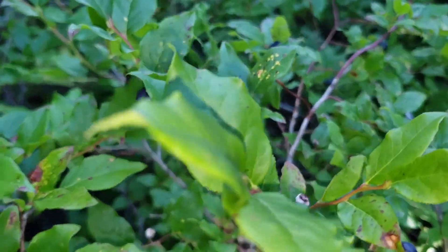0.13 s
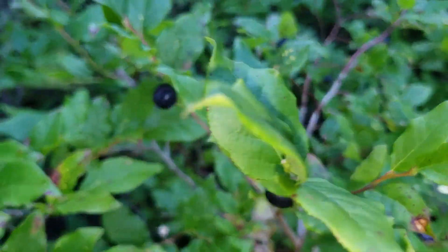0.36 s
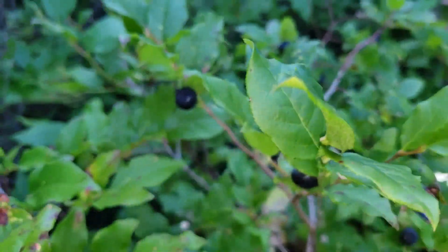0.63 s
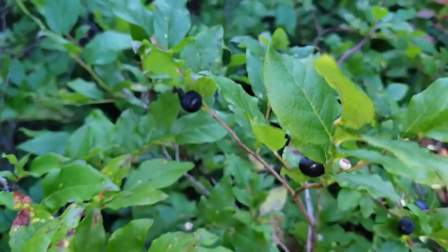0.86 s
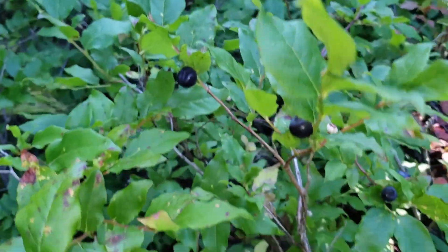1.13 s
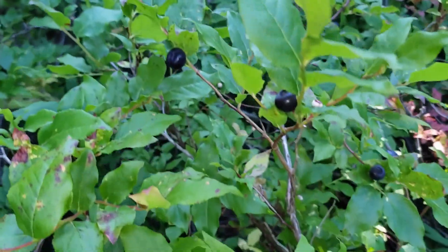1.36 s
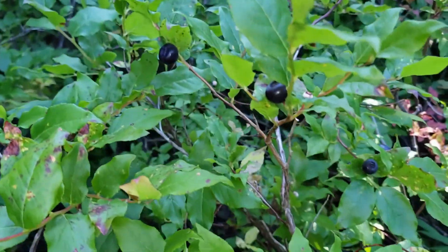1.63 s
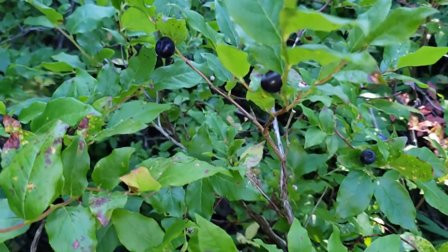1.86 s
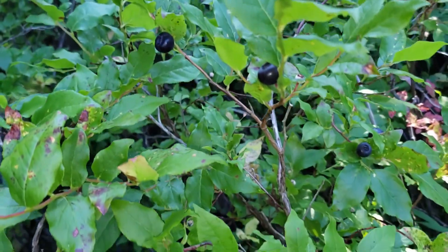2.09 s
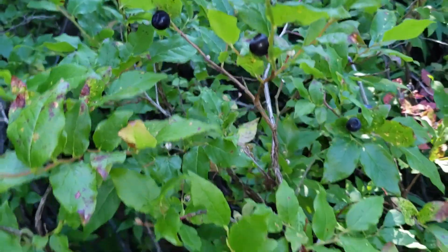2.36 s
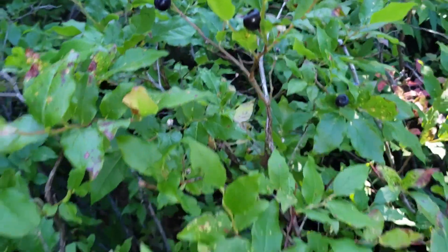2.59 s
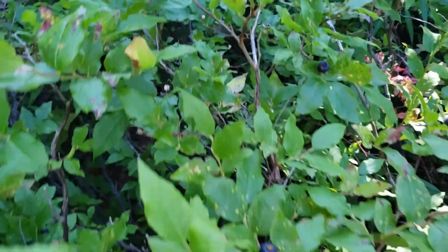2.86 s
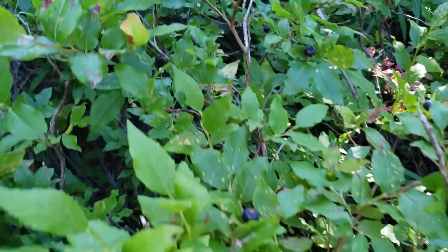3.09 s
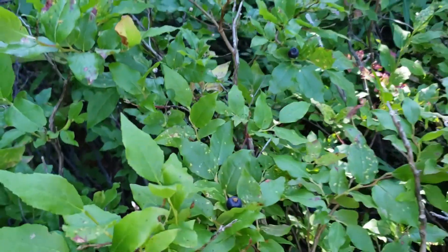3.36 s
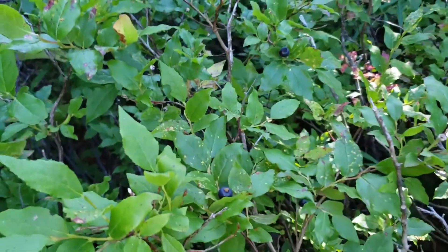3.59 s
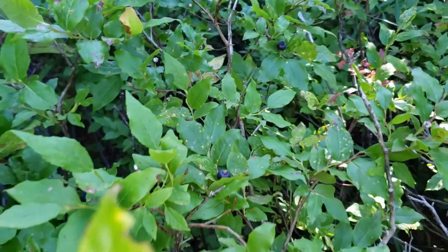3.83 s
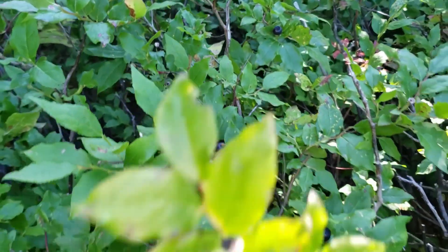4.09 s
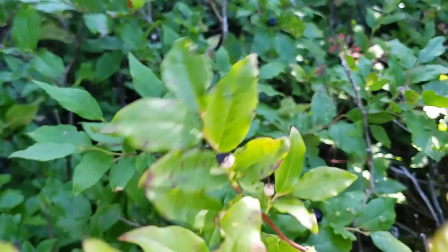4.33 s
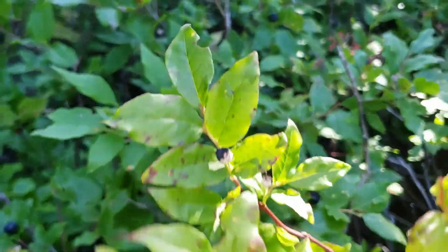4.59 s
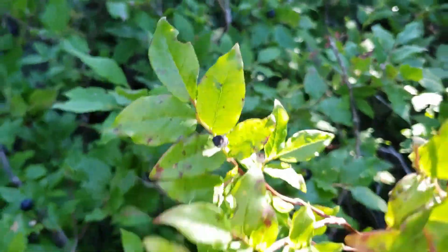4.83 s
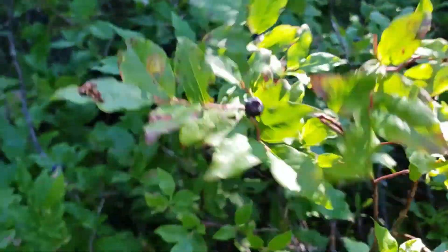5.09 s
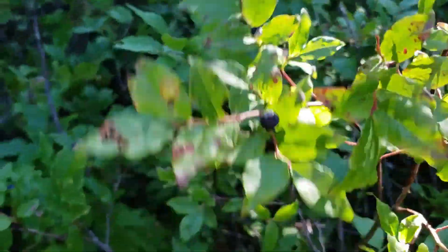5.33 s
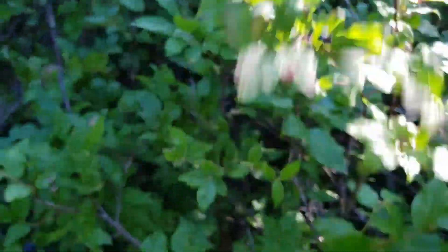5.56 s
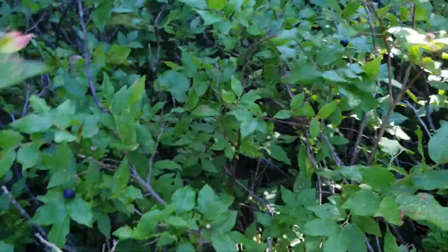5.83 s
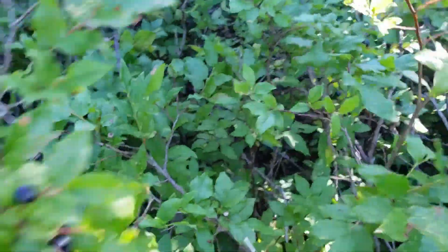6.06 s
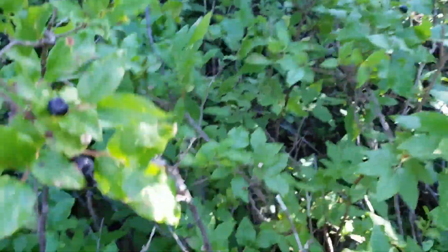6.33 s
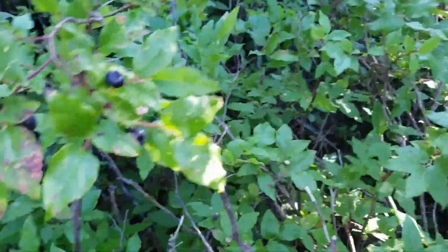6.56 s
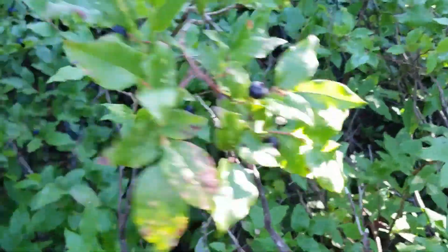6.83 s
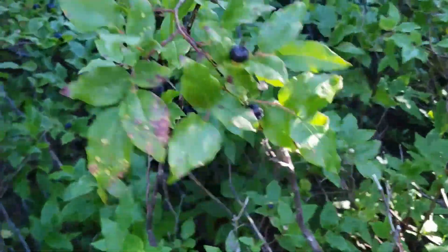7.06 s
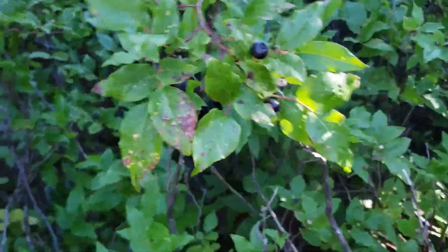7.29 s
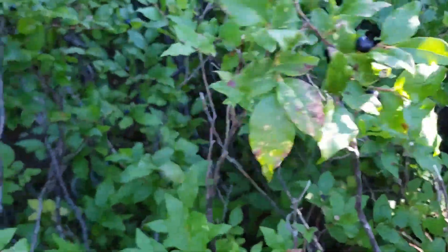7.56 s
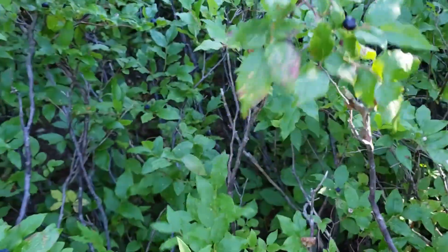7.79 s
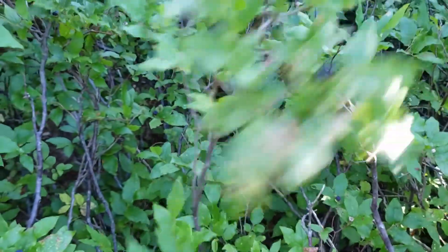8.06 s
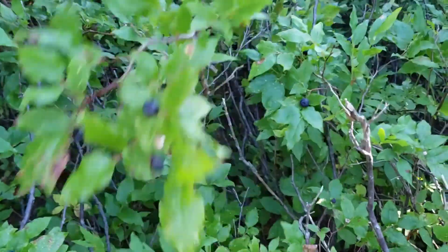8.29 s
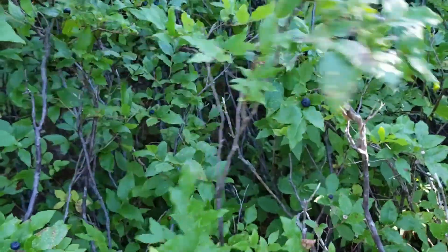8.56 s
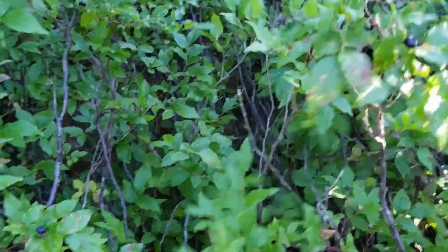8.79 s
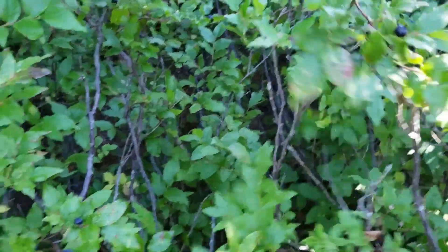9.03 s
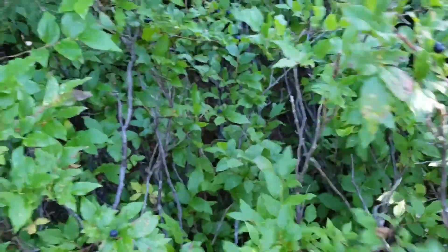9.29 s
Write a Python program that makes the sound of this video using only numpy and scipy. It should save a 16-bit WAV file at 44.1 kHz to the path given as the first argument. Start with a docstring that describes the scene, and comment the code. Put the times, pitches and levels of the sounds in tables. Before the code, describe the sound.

Someone pushes through leafy shrubs outdoors: crisp leaf swishes, scraping stems, dry snaps and dull branch knocks, ending in the loudest rustling.

```python
"""A hand pushes through berry bushes close beside a small stereo recorder, in the open with no walls.
Leaves brush, stems scrape and branches rub as dense coloured ticks; twigs crack, stiff leaves flick and
leaf tips tick as dying showers of them. Branches and fingers knock as sagging low modes, bumps of the
case are slow swings, and the grip rumbles and rubs. A springy branch swishes back as a swell of noise;
a faint breeze and far-off rumble fill the gaps. The two microphones stand apart and differ in colour."""
import sys
import numpy as np
from scipy import signal
from scipy.fft import rfft, irfft
from scipy.io import wavfile
from scipy.ndimage import uniform_filter1d

SR = 44100
rng = np.random.default_rng(int(sys.argv[2]) if len(sys.argv) > 2 else 0)


def bounce(signal):
    """Save signal as a 16-bit WAV file at the path given by the first command-line argument."""
    frames = np.transpose(np.atleast_2d(signal))
    limited = np.clip(frames, -1, 1)
    pcm = np.round(limited * 32767).astype(np.int16)
    wavfile.write(sys.argv[1], SR, pcm)


def invert_db(x):
    """Field ratio 10**(x/20) for x, a level in decibels (scalar or array-like)."""
    u = np.asarray(x, float) / 20
    return 10 ** u


N = 414981  # length in samples

# All levels are nominal, ahead of the microphones; left_minus_right_db is positive towards the left.
# Brushing close by, one list per stroke: time_s, leaf_edge_crinkle_db, stem_scrape_db
BRUSH_STROKES = [
    [(0, -70.5, -79), (0.12, -65, -84), (0.27, -60, -69.5), (0.39, -67, -84), (0.63, -67.5, -76.5),
     (0.83, -66, -78.5), (1.13, -73.5, -81.5), (1.48, -69, -81.5), (1.75, -100, -88), (1.99, -74, -94),
     (2.13, -83, -100), (2.23, -56, -74)],
    [(2.245, -46, -59), (2.387, -50.5, -66), (2.49, -53.5, -67.5), (2.599, -56.5, -66),
     (2.65, -46.5, -62.5), (2.741, -47, -61.5), (2.835, -51.5, -64), (3.037, -55.5, -73.5)],
    [(3.047, -51, -70), (3.131, -58.5, -60.5), (3.249, -59.5, -70), (3.299, -56, -63.5),
     (3.413, -58, -70.5), (3.655, -60.5, -72), (3.861, -59, -70), (3.915, -57, -72.5), (4.015, -56, -60.5)],
    [(4.025, -44, -50), (4.07, -37.5, -50.5), (4.125, -53, -59), (4.165, -57, -58), (4.18, -50, -58),
     (4.205, -52, -49.5), (4.303, -57, -61.5), (4.345, -60, -70)],
    [(4.36, -61, -74), (4.404, -73, -89), (4.582, -61, -77.5), (4.704, -57, -77.5), (4.842, -59.5, -72),
     (4.9, -61, -70), (4.948, -64.5, -80), (5.0, -52, -64)],
    [(5.056, -60.5, -69), (5.166, -50.5, -63.5), (5.225, -50.5, -61.5), (5.26, -44.5, -59.5),
     (5.31, -50, -62.5), (5.37, -48.5, -58.5), (5.4, -59.5, -74)],
    [(5.502, -56.5, -71.5), (5.654, -56, -68), (5.736, -61.5, -73.5), (5.944, -61, -73),
     (6.132, -59.5, -68), (6.185, -66, -72)],
    [(6.195, -48.5, -62), (6.279, -59.5, -72), (6.417, -64, -76.5), (6.551, -63, -76.5), (6.751, -58, -72),
     (6.915, -68, -74.5), (7.121, -67, -78), (7.253, -64, -84), (7.33, -76, -80), (7.36, -62, -67),
     (7.45, -70, -70), (7.541, -68.5, -73.5), (7.695, -54.5, -66), (7.735, -56, -60)],
    [(7.745, -41, -47.5), (7.841, -46, -56.5), (7.883, -43, -51.5), (8.003, -51.5, -58.5),
     (8.129, -51.5, -65), (8.263, -53, -64.5), (8.337, -64, -81)],
    [(8.523, -61.5, -88), (8.579, -57, -75), (8.661, -51.5, -64.5), (8.76, -46, -56), (8.83, -39, -56),
     (8.86, -45.5, -56), (8.903, -39, -51.5), (8.981, -40.5, -54.5), (9.03, -44, -54.5), (9.06, -38.5, -51),
     (9.09, -37, -53.5), (9.14, -35, -48.5), (9.2, -32.5, -45), (9.26, -40, -53.5), (9.31, -38.5, -49.5),
     (9.35, -36, -49), (9.41, -34.5, -48)],
]
# Branches rubbing on each other: time_s, level_db
BRANCH_RUB = [(0, -72), (0.8, -70), (1.62, -73), (2.13, -78), (2.245, -58.5), (2.39, -62), (2.741, -58),
              (2.835, -66), (3.3, -68), (3.9, -74), (4.025, -57.5), (4.149, -63), (4.195, -54),
              (4.345, -63), (4.42, -84), (4.56, -73), (4.7, -75.5), (5.056, -66.5), (5.324, -60.5),
              (5.5, -74), (5.9, -73), (6.0, -64), (6.5, -70.5), (6.9, -76), (7.39, -68.5), (7.64, -71.5),
              (7.745, -55), (7.883, -54.5), (8.003, -65.5), (8.263, -66), (8.5, -81), (8.791, -58.5),
              (8.903, -51), (9.051, -52.5), (9.3, -44.5), (9.41, -46.5)]
# Grip shifting on the recorder: time_s, rumble_db, cloth_and_finger_rub_db
GRIP_SHIFTS = [(0.0, -76.5, -79), (1.57, -80.5, -90), (2.22, -76, -78), (2.41, -76, -63.5),
               (2.53, -77, -64), (2.62, -75, -58), (2.76, -79, -68), (2.86, -76, -75), (3.88, -79, -82),
               (4.22, -65, -63), (4.43, -80, -81.5), (5.13, -70, -70.5), (5.58, -70.5, -75),
               (5.89, -83, -75.5), (6.37, -82, -81), (7.94, -71.5, -68.5), (8.49, -86.5, -78.5),
               (8.72, -78, -70.5), (8.92, -71, -57.5), (9.04, -70, -64), (9.18, -74, -53.5),
               (9.25, -79, -55), (9.41, -79, -54)]
# Twigs snapping: start_s, body_db, fine_splinters_db, body_pitch_hz, left_minus_right_db
TWIG_SNAPS = [(0.7647, -47.5, -40, 2890, 6.5), (2.241, -43, -25, 6300, 10), (2.2427, -45, -26, 6260, 10),
              (2.048, -56, -49, 3500, 9), (2.053, -54.5, -60, 2000, 7.5), (3.075, -22.5, -21, 6040, -6.5),
              (3.0786, -25.5, -30, 4200, -2.5), (3.089, -30, -36, 4300, -3),
              (3.0924, -33.5, -35, 4000, -6.5), (3.135, -49, -58, 2650, 0.5), (3.252, -55, -36, 6520, -2),
              (3.976, -35.5, -35, 2290, -2), (4.042, -30, -18, 2460, 7), (4.032, -39, -36, 1880, -2),
              (4.065, -42, -38, 5000, 1), (4.099, -39.5, -50, 1600, -2.5), (4.143, -42.5, -47, 1450, -4),
              (4.162, -47, -60, 1300, 0), (4.198, -41, -55, 1300, 4), (4.2117, -25.5, -32, 2300, 5),
              (4.219, -26, -15, 7000, -0.5), (4.2199, -33.5, -18, 1420, -5),
              (4.2216, -22, -11.5, 4000, -1.5), (4.2243, -32, -12, 3020, 2), (4.2253, -19.5, -8.5, 4400, 2),
              (4.227, -23.5, -10.5, 4020, -1), (4.2301, -23.5, -18, 4080, -0.5),
              (4.245, -50.5, -36.5, 6500, 8), (5.061, -44, -37.5, 7040, -1.5), (5.317, -39, -45, 3020, 0.5),
              (5.535, -40, -26, 4700, 6.5), (5.5376, -34.5, -26, 7100, 6), (5.681, -41, -58, 1800, -4),
              (5.698, -16.5, -8, 4800, -5.5), (5.699, -24.5, -23, 2100, -8), (5.703, -34, -42, 3000, -8),
              (6.118, -46, -57, 6500, 9), (6.696, -47, -41, 7520, -4), (6.812, -40, -32.5, 5200, 7),
              (6.9388, -32.5, -58, 2860, -8.5), (6.9411, -40, -60, 2900, -7), (6.943, -43, -63, 2000, -6),
              (7.3435, -35.5, -43, 3940, 5), (7.4248, -47, -67, 1500, -7), (7.672, -41, -48, 2940, -8),
              (7.69, -30, -27, 2230, 4.5), (7.719, -43, -60, 2800, -1), (7.742, -27.5, -28.5, 3730, 1.5),
              (7.7435, -27, -30, 2980, 2), (7.915, -25, -34, 4060, -1.5), (7.928, -34, -48, 2970, 1),
              (7.935, -35, -50, 3500, -1), (8.031, -38.5, -32, 6340, -8), (9.062, -25.5, -39, 6570, -3),
              (9.23, -35, -22, 5640, 5), (9.274, -42, -32, 4690, 1.5), (9.345, -39, -31, 6790, -1)]
# Stiff leaves flicking past and scraping:
# start_s, fine_splinters_db, body_db, body_pitch_hz, dying_time_ms (held to 40 at most), left_minus_right_db
LEAF_FLICKS = [(0.204, -56, -75, 2000, 9.1, -1), (0.275, -58, -64, 2700, 10, 2.5),
               (0.531, -60, -53, 2200, 4, 3), (0.534, -60, -61.5, 6000, 30, -1),
               (0.54, -70, -62, 2540, 15, -1), (0.766, -40.5, -57, 2760, 6.1, 2.5),
               (0.968, -36, -52.5, 2980, 10.5, 7), (1.094, -61, -65, 2900, 4.3, 1),
               (1.345, -54, -64, 2830, 49, 3), (1.527, -64, -61, 2830, 6.7, 2.5),
               (1.974, -57, -69, 4000, 6, 6.5), (2.243, -31, -48, 6600, 7.2, 7),
               (2.373, -44, -45, 6570, 5.1, 4.5), (2.445, -46, -49.5, 5000, 19, 6),
               (2.632, -49, -48.5, 2700, 27, 2), (2.842, -38.5, -49, 6700, 10, 8),
               (2.861, -45, -59, 6700, 7.3, 7), (3.152, -32.5, -45, 7350, 10.6, 7.5),
               (3.297, -40, -52, 2700, 5.3, 4), (3.32, -44, -65, 5000, 5.5, 1),
               (3.484, -38, -48, 2500, 6.3, 0), (3.593, -43.5, -50, 5070, 6.1, -2.5),
               (3.604, -52, -51, 5500, 3.7, 0), (3.911, -43, -66, 4630, 3, 1),
               (4.021, -36, -39, 3000, 4, 1.5), (4.05, -45, -42.5, 6540, 26, 3),
               (4.208, -32, -32, 4000, 11, 5.5), (4.219, -26, -32, 3500, 5.4, -1.5),
               (4.321, -38, -48, 2820, 8, 1), (4.825, -42.5, -52.5, 6700, 27, 0),
               (4.962, -43, -50, 6300, 8, -0.5), (4.969, -38.5, -51, 4060, 9.5, 2),
               (5.236, -43, -54, 7390, 3, 6), (5.244, -33, -43, 7390, 4, 6.5),
               (5.252, -40.5, -54, 7390, 23, 6), (5.368, -47, -51, 4000, 3.6, -1),
               (5.548, -39, -45.5, 5100, 5.7, 4.5), (5.339, -43, -51, 6800, 4.4, 6),
               (5.35, -46, -52, 6800, 15, 7.5), (5.747, -44, -52, 4480, 4.7, 4.5),
               (5.983, -46, -64, 6000, 6, 6), (6.094, -37.5, -45, 3830, 3.3, 1),
               (6.191, -46, -57.5, 7060, 21, 5), (6.58, -43.5, -54.5, 4100, 12, -2.5),
               (6.735, -45, -52.5, 5900, 31, 0), (6.8, -47, -58, 6000, 6.6, 5),
               (7.113, -50.5, -66, 6510, 8.7, 9), (7.395, -47.5, -69, 6000, 5.7, 6.5),
               (7.754, -36, -42.5, 7400, 33, 1), (7.901, -48, -42.5, 3000, 26, -3),
               (8.009, -28, -40.5, 2940, 3.7, -3), (8.145, -37, -46.5, 2290, 29, -0.5),
               (8.201, -37, -50, 6780, 12, -0.5), (8.271, -38, -62, 7100, 6.2, 6.5),
               (8.95, -30, -44, 3260, 3, -4.5), (9.175, -31, -37, 5500, 6, 0),
               (9.209, -22.5, -38, 6240, 4, 8.5)]
# Leaf tips ticking, nearly all splinter: start_s, fine_splinters_db, left_minus_right_db
LEAF_TIPS = [(0.6474, -46, 5), (0.9093, -46, 2.5), (2.2144, -43, 5.5), (2.435, -43, 4), (2.794, -40, 4),
             (3.247, -45, -11), (3.3972, -46, 8), (3.4221, -47, 1), (3.6526, -45, 7), (3.8921, -52, 6),
             (3.908, -44, -2), (4.1723, -35, 5), (5.015, -47, 1.0), (5.215, -37, 7), (5.471, -40, 5),
             (6.8638, -51, 7), (7.3425, -43, 8), (7.3864, -44, 8), (7.417, -49, 4), (8.0621, -47, 0),
             (8.0925, -41, 5.0)]
# Dull knocks of branches and fingers:
# start_s, level_db, nominal_pitch_hz, cycles_until_60_db_down, left_minus_right_db
DULL_KNOCKS = [(0.693, -54, 800, 8, 3), (0.764, -55.5, 450, 14, -2), (2.241, -40.5, 298, 13, 1),
               (2.268, -48, 198, 16, 0), (2.45, -53, 228, 15, -4), (2.49, -49.5, 800, 12, 4.0),
               (2.554, -41, 383, 6.5, 0), (2.596, -37.5, 330, 5.5, -1), (2.615, -46.5, 250, 15, -3),
               (2.662, -44.5, 450, 14, 1), (2.668, -50, 210, 10, -4), (2.637, -48, 517, 15, 0),
               (2.74, -46, 221, 8, -4), (2.756, -49, 180, 5.5, 3), (4.036, -54, 136, 29, -3),
               (4.189, -50, 590, 28, -19), (4.327, -50, 248, 20, -8), (5.315, -37.5, 350, 4, -6),
               (5.5355, -44.5, 600, 16, -4), (5.5357, -46, 1410, 26, 0), (5.698, -31, 208, 3, -30.5),
               (5.7005, -43, 720, 16, 6), (5.7, -27.5, 480, 6, -13.5), (5.725, -49.5, 440, 8, -13),
               (5.933, -54, 500, 6, -7), (5.951, -47, 320, 21, -2), (6.006, -48, 323, 17, -2),
               (6.019, -53, 302, 20, -4), (6.065, -59, 215, 30, 1), (6.095, -47.5, 920, 18, 0),
               (6.58, -59, 380, 10, 0), (6.61, -59, 380, 13, -2), (6.938, -47, 700, 9.5, -10),
               (7.343, -41.5, 880, 14, -6.5), (7.4245, -44, 700, 6.5, -12), (7.691, -40, 880, 5, -4),
               (7.75, -46, 594, 21, -4), (8.139, -56, 908, 19.5, -8), (8.898, -50.5, 303, 19, 1),
               (8.95, -45, 217, 13, -1), (9.1, -47, 397, 8, 2), (9.24, -46, 200, 14, -1),
               (9.219, -36.5, 207, 13, -1), (9.283, -37, 450, 12, 0), (9.294, -30, 523, 13, 3),
               (9.397, -34.5, 606, 17, 9)]
# Deep thumps of the bumped case: start_s, peak_db, final_pitch_hz, length_cycles, left_minus_right_db
CASE_THUMPS = [(4.251, -55.5, 59, 1.4, -6), (5.039, -56.5, 51, 2, -21), (5.671, -47, 59, 1.5, -22),
               (5.697, -41, 70.5, 1.4, -23), (5.705, -54, 145, 13, 10), (5.71, -46, 50, 1.1, -20.5),
               (5.744, -54, 60, 1, -16), (6.137, -55.5, 58, 1.9, 20), (6.953, -55.5, 54.4, 2.9, -16),
               (7.141, -57.5, 55, 4, -21), (7.422, -50.5, 75.4, 2, -17)]
# Colour of crinkling leaf edges: frequency_hz, gain_db
LEAF_EDGE_COLOUR = [(5000, -38.5), (8000, -3), (10000, -3), (13000, -1), (15200, -1.5)]
# Colour of brushing leaf faces: frequency_hz, gain_db
LEAF_FACE_COLOUR = [(2500, -23.5), (3800, 0.5), (5000, 2.5), (7000, -1), (8500, -7), (11000, -15)]
# Colour of scraping stems: frequency_hz, gain_db
STEM_COLOUR = [(900, -26), (1500, -5), (2200, -2.5), (3200, -1.5), (4200, -15), (6000, -22)]
# Colour of branches and twig wood: frequency_hz, gain_db
WOOD_COLOUR = [(150, -14.5), (320, -5.5), (520, -2.5), (800, -3), (1300, -7), (2200, -21.5)]
# Colour of fine splinters: frequency_hz, gain_db
SPLINTER_COLOUR = [(5000, -38.5), (7500, -6.5), (10000, -5.5), (12500, -0.5), (15500, -1.5)]
# Colour of the grip's rumble through the case: frequency_hz, gain_db
RUMBLE_COLOUR = [(20, -42), (40, -1.5), (60, 3), (120, -1), (250, -30)]
# Colour of cloth and fingers rubbing the case: frequency_hz, gain_db
RUB_COLOUR = [(85, -31), (140, -2.5), (210, 1.5), (330, -5), (600, -33.5)]
# Colour of the breeze and distant rumble: frequency_hz, gain_db
AIR_COLOUR = [(18, -39), (30, -1.5), (71, -2), (215, -17), (355, -6.5), (937, -3.5), (1460, -10.5),
              (3580, -18.5), (5740, -37), (6720, -21), (8300, -34), (14800, -11.5), (16000, -13)]
# Port resonances that both microphones share: frequency_hz, gain_db
CAPSULE_COLOUR = [(1800, 0.5), (3000, -0.5), (4600, -2.5), (6900, 1), (8300, -7.5), (10000, -0.5),
                  (15300, 3)]
# How the two microphones differ in colour: frequency_hz, left_minus_right_db
PORT_DIFFERENCE = [(60, 7), (200, 5), (700, -1.5), (1300, 1), (2400, -5), (4400, -6), (6800, 6.5),
                   (7700, 6), (8700, -9), (10500, 1.5), (15000, 2.5)]

SPACING_S = 0.00045  # time for sound to cross from one microphone to the other
SNAP_DYING_MS = 0.9  # dying time of twig snaps and leaf tips
EARS = np.array([[1], [-1]])  # left, right


def colour(x, points, sides=1):
    """Causal filter through (Hz, dB) points, from the folded cepstrum of the log gain."""
    hz, db = np.transpose(points)
    grid_hz = np.maximum(np.linspace(0, SR / 2, 2049), 1)
    gain_db = np.interp(np.log(grid_hz), np.log(hz), db)
    cepstrum = irfft(np.log(invert_db(np.outer(sides, gain_db))))
    cepstrum[:, 1:2048] *= 2
    cepstrum[:, 2049:] = 0
    impulse = irfft(np.exp(rfft(cepstrum)))
    return signal.fftconvolve(x, impulse, axes=1)[:, :N]


def unit(points):
    """Gain that gives white noise through this colour an rms of 1."""
    impulse = np.eye(2, 4096)
    return 1 / np.sqrt(np.sum(colour(impulse, points)[0] ** 2))


def walk(rate_hz):
    """Random levels held for one period of the rate and slewed twice; spread near 1."""
    hold = int(SR / rate_hz)
    steps = np.repeat(rng.standard_normal(N // hold + 1), hold)
    return uniform_filter1d(uniform_filter1d(steps, hold), hold)[:N] / 0.75


def levels(rows):
    """Level columns in dB, drawn straight from one time_s to the next."""
    time_s, *columns = np.transpose(rows)
    return [np.interp(np.arange(N) / SR, time_s, column) for column in columns]


def ticks(start_s, size, side, pan_db):
    """Tiny impulses that reach the nearer microphone first; side runs from -1 (right) to 1 (left)."""
    at = np.clip((start_s - EARS * side * SPACING_S / 2) * SR, 0, N - 1).astype(int)
    weight = size * invert_db(EARS * pan_db / 2)
    return np.array([np.bincount(at[ear], weight[ear], N) for ear in range(2)])


def sizes(chance, spread_db):
    """Signed sizes, rms 1; a positive spread gives a long tail of rare large ones."""
    rarity = -np.log(np.abs(2 * chance - 1) + 1e-4)
    size = np.sign(chance - 0.5) * invert_db(spread_db * rarity)
    return size / np.sqrt(np.mean(size ** 2))


def rustle(level_db, pan_db, points, count, spread_db, patchy_db):
    """Many small slips all round the microphones, in patches that swell and fade."""
    when, chance, side = rng.random((count, 3)).T
    i = (when * N).astype(int)
    slip_db = level_db + patchy_db
    size = sizes(chance, spread_db) * invert_db(slip_db[i]) * np.sqrt(N / count)
    slips = ticks(i / SR, size, 2 * side - 1, pan_db[i])
    return unit(points) * colour(slips, points)


def brushing():
    """Leaves, stems and branches slip in many small ticks, sharing jerks, each with its own flicker."""
    edge_db, stem_db = levels(np.concatenate(BRUSH_STROKES))
    [branch_db] = levels(BRANCH_RUB)
    leaf_push = edge_db + 49  # dB relative to a firm stroke
    stem_push = stem_db + 57
    # leaf faces follow the crinkle, pulled partly by the stems
    stem_share = 0.36
    face_db = -56.5 + 1.06 * ((1 - stem_share) * leaf_push + stem_share * stem_push)
    pan_db = 1 - 0.15 * leaf_push  # fainter brushing comes from further left
    jerk = 0.4 * walk(70)

    edges = rustle(edge_db, pan_db, LEAF_EDGE_COLOUR, count=200000, spread_db=0.0,
                   patchy_db=1.7 * jerk + 1.2 * walk(120))
    faces = rustle(face_db, pan_db, LEAF_FACE_COLOUR, count=60000, spread_db=1.5,
                   patchy_db=3.5 * jerk + 0.48 * walk(67))
    stems = rustle(stem_db, 0.52 * pan_db, STEM_COLOUR, count=30000, spread_db=0.5,
                   patchy_db=1.3 * jerk + 1.34 * walk(60))
    branches = rustle(branch_db, 0.53 * pan_db, WOOD_COLOUR, count=20000, spread_db=2.0,
                      patchy_db=0.92 * jerk + 1.92 * walk(25))
    # dry leaf veins give way one by one, heard as separate ticks over the hiss
    crackle = rustle(edge_db - 5.5, pan_db, LEAF_EDGE_COLOUR, count=3500, spread_db=2.2, patchy_db=3 * jerk)
    crackle += rustle(face_db - 6, pan_db, LEAF_FACE_COLOUR, count=3000, spread_db=2.2, patchy_db=3 * jerk)
    crackle += rustle(stem_db - 6, pan_db, STEM_COLOUR, count=1500, spread_db=2.4, patchy_db=3 * jerk)
    return edges + faces + stems + branches + crackle


def grip():
    """Low rumble through the case, separate at each microphone, and a rub that both share in part."""
    rumble_db, rub_db = levels(GRIP_SHIFTS)
    pan_db = np.full(N, -13.0)  # the hand is on the right
    rumble = unit(RUMBLE_COLOUR) * colour(rng.standard_normal((2, N)), RUMBLE_COLOUR)
    left_db = rumble_db + pan_db / 2 + 2.2 * walk(7.1)
    right_db = rumble_db - pan_db / 2 + 1.0 * walk(4.1)
    rumble *= invert_db([left_db, right_db])
    rub = rustle(rub_db, 0.57 * pan_db, RUB_COLOUR, count=5000, spread_db=1.5, patchy_db=2.5 * walk(30))
    return rumble + rub


def air():
    """Breeze in far foliage and a distant rumble, from every side: dense ticks of fairly even size."""
    return rustle(np.full(N, -69), np.full(N, 2.5), AIR_COLOUR, count=300000, spread_db=-4.5,
                  patchy_db=walk(4.6))


def cracks():
    """A shower of splitting fibres that dies away; it rings the body of the twig or leaf."""
    rows = [(s, body, fine, hz, SNAP_DYING_MS, pan) for s, body, fine, hz, pan in TWIG_SNAPS]
    rows += [(s, body, fine, hz, ms, pan) for s, fine, body, hz, ms, pan in LEAF_FLICKS]
    rows += [(s, fine - 22, fine, 6000, SNAP_DYING_MS, pan) for s, fine, pan in LEAF_TIPS]
    columns = (column[:, None] for column in np.transpose(sorted(rows)))
    start_s, body_db, fine_db, body_hz, dying_ms, pan_db = columns

    count, span_s = 500, 0.08  # fibres in a shower, and its longest extent
    when, chance, side = rng.random((len(rows), count, 3)).transpose(2, 0, 1)
    age_s = span_s * when ** 2  # crowded at the start
    dying_s = np.clip(dying_ms, 0.3, 40) / 1000
    # long scrapes also start more softly
    shape = (1 - np.exp(-age_s / (0.15 * dying_s))) * np.exp(-age_s / dying_s)
    # the first break, strong in short cracks
    first_break = (age_s / 0.00049) * np.exp(-age_s / 0.00013)
    shape += 2.3 / (1 + dying_s / 0.0037) * first_break
    shape *= np.sqrt(2 * when * span_s * SR / count)  # evens out the crowding
    size = sizes(chance, spread_db=1.5) * shape
    # the random sizes leave the energy of each shower as its shape sets it
    size *= np.sqrt(np.sum(shape ** 2, 1) / np.sum(size ** 2, 1))[:, None]
    width = 0.44 * np.clip(dying_s / 0.006, 0.3, 1)  # longer scrapes spread wider
    side = np.clip(pan_db / 9 + width * (2 * side - 1), -1, 1)

    def shower(level_db):
        """The same fibres at another level."""
        pan = pan_db + 0 * age_s
        return ticks((start_s + age_s).ravel(), (size * invert_db(level_db)).ravel(), side.ravel(), pan.ravel())

    out = unit(SPLINTER_COLOUR) * colour(shower(fine_db), SPLINTER_COLOUR)
    wood_db = body_db - 12.5 - 14 * np.log2(body_hz / 3000)  # lower bodies are thicker wood
    out += unit(WOOD_COLOUR) * colour(shower(wood_db), WOOD_COLOUR)
    body = shower(body_db)
    edges = np.append((start_s[:, 0] * SR).astype(int) - 30, N)
    clearness = 0.68 * np.clip(3500 / body_hz, 0, 1)  # low bodies ring more clearly
    for i, j, hz, clear in zip(edges, edges[1:], body_hz[:, 0], clearness[:, 0]):
        band = signal.butter(3, [hz / 2.03, min(hz * 2.06, 9000)], "bandpass", fs=SR)
        piece = np.pad(body[:, i:j], ((0, 0), (0, 400)))[:, :N - i]  # room to ring on
        broad = signal.lfilter(*band, piece) * np.sqrt(SR / 2 / (0.59 * hz))
        # one clearer mode stands out of the broad body
        mode = signal.lfilter(*signal.iirpeak(hz, 11, SR), broad)
        out[:, i:i + piece.shape[1]] += 0.6 * broad + 1.5 * clear * mode
    return out


def knocks():
    """Branches and fingers bump: a low mode dies in a few cycles, with a loose rattle unlike in each ear."""
    out, t = np.zeros((2, N + SR)), np.arange(SR // 4) / SR
    rattles = rng.standard_normal((len(DULL_KNOCKS), 2, len(t)))
    for (start_s, db, hz, cycles, pan_db), noise in zip(DULL_KNOCKS, rattles):
        fade = np.exp(-np.log(1000) * t * hz / max(cycles, 1))
        pitch_hz = hz * (0.87 + 0.37 * fade)  # sags as contact loosens
        mode = np.sin(2 * np.pi * np.cumsum(pitch_hz) / SR) * fade
        band = signal.butter(1, [hz / 2.3, hz * 1.34], "bandpass", fs=SR)
        rattle = signal.lfilter(*band, noise)
        tail = np.sqrt(fade) * (1 - np.exp(-t * hz / 0.079))  # sets in later and outlasts the mode
        knock = mode / np.abs(mode).max() + invert_db(-8) * rattle / rattle.std() * tail
        # the knock carries little deep bass below its mode
        knock = signal.lfilter(*signal.butter(2, hz / 2.8, "highpass", fs=SR), knock)
        i = int(start_s * SR)
        out[:, i:i + len(t)] += knock * invert_db(db + EARS * pan_db / 2)
    return out[:, :N]


def thumps():
    """The bumped case makes a few slow swings that start quick, slow down and stop."""
    out, t = np.zeros((2, N + SR)), np.arange(SR // 4) / SR
    extra_pitch, settle_cycles = 1.43, 0.29  # share added at first contact, and how soon it settles
    for start_s, db, hz, cycles, pan_db in CASE_THUMPS:
        done = np.clip(t * hz / max(cycles, 0.5), 0, 1)
        pitch_hz = hz * (1 + extra_pitch * np.exp(-t * hz / settle_cycles))
        swing = np.sin(2 * np.pi * np.cumsum(pitch_hz) / SR)
        swing = swing * np.sin(np.pi * done ** 0.37)
        i = int(start_s * SR)
        out[:, i:i + len(t)] += swing * invert_db(db + EARS * pan_db / 2)
    return out[:, :N]


def swish():
    """A springy branch swishes back through the air: a soft swell of narrow noise."""
    peak_s, rise_s, fall_s = 4.56, 0.034, 0.078
    level_db, centre_hz, width_hz = -64, 550, 250
    late_s = np.arange(N) / SR - peak_s
    swell = np.exp(-0.5 * (late_s / np.where(late_s < 0, rise_s, fall_s)) ** 2)
    edges_hz = [centre_hz - width_hz / 2, centre_hz + width_hz / 2]
    band = signal.butter(2, edges_hz, "bandpass", fs=SR, output="sos")
    shared, apart = signal.sosfilt(band, rng.standard_normal((2, N)))
    stereo = shared + 0.54 * apart * EARS  # the second noise is opposite in the two ears
    return invert_db(level_db) * swell * stereo / shared.std()


def scene():
    """Everything in the open air, with no reflections."""
    return brushing() + grip() + air() + cracks() + knocks() + thumps() + swish()


def band_limit(x):
    """A steep low-pass at the top of the band."""
    return signal.sosfilt(signal.butter(12, 17000, fs=SR, output="sos"), x)


def record(dry):
    """Two microphones of unlike colour that lose the deep bass, then a steep top cut."""
    mix = colour(dry, CAPSULE_COLOUR)
    mix = colour(mix, PORT_DIFFERENCE, sides=[0.5, -0.5])
    bass_cut = signal.butter(2, 42, "highpass", fs=SR, output="sos")
    mix = signal.sosfilt(bass_cut, mix)
    top_cut = signal.ellip(8, 0.3, 45, 15900, fs=SR, output="sos")
    mix = signal.sosfilt(top_cut, mix)
    return band_limit(mix)


dry = scene()
out = record(dry)
bounce(out)
```